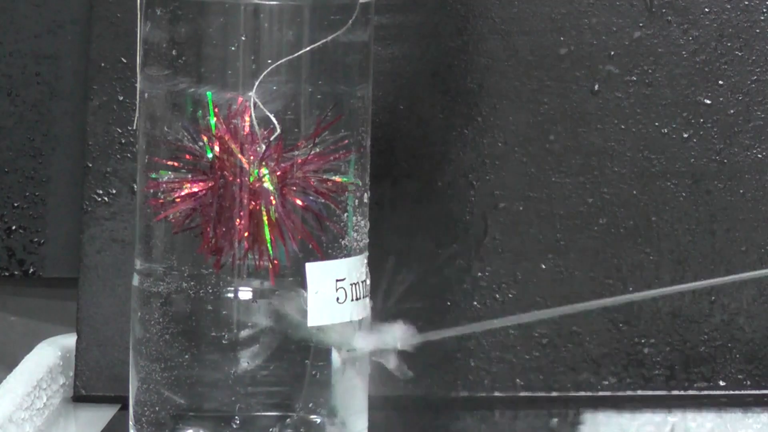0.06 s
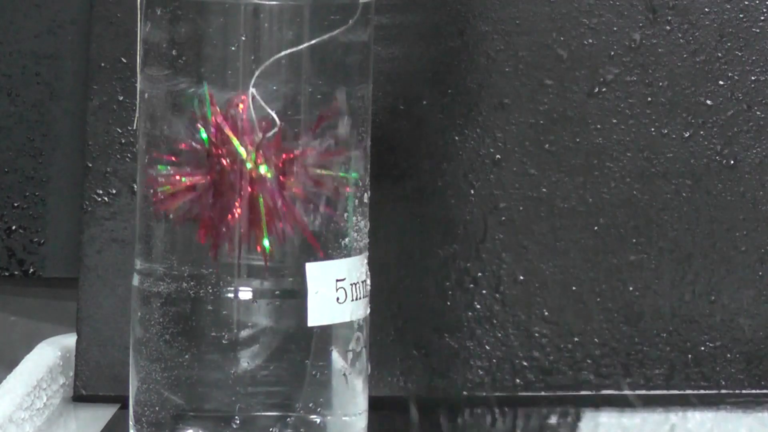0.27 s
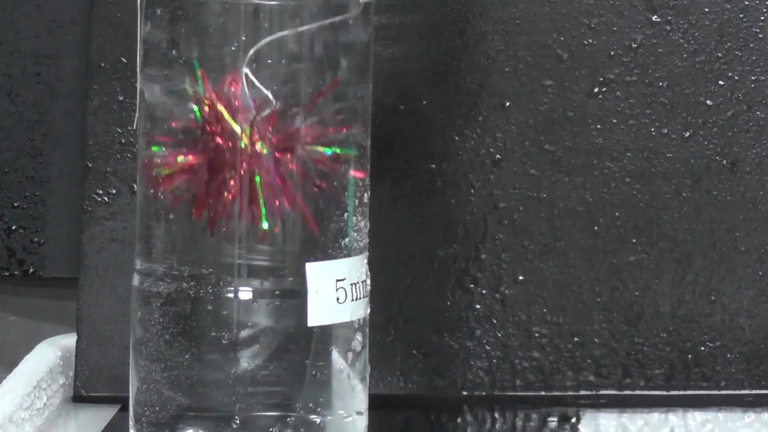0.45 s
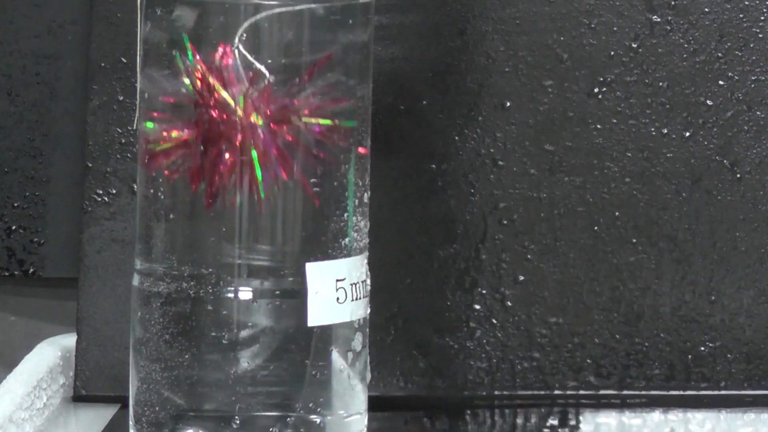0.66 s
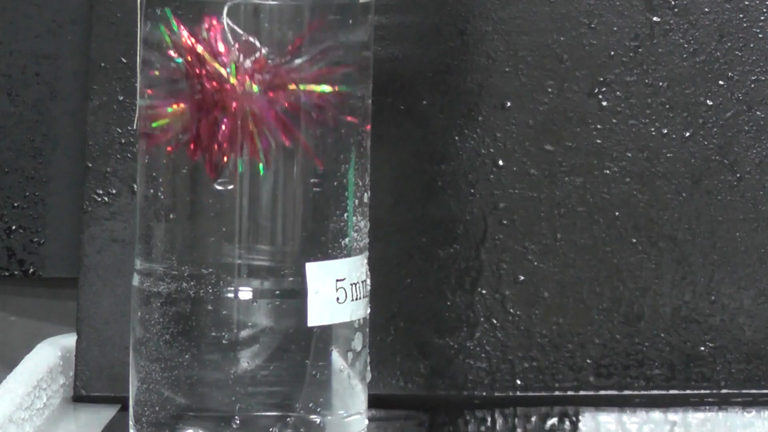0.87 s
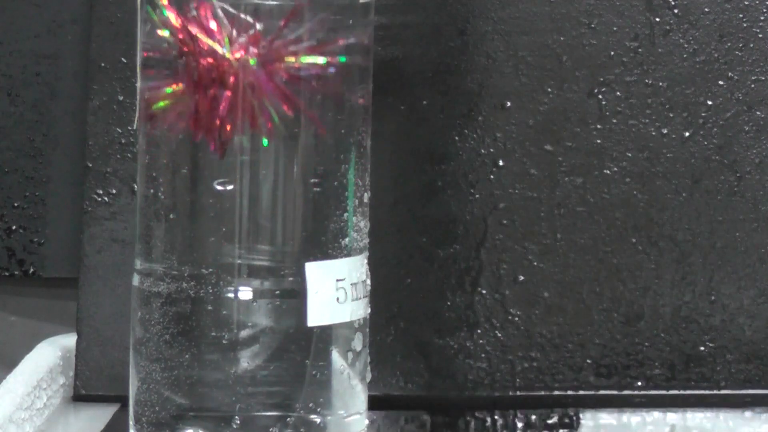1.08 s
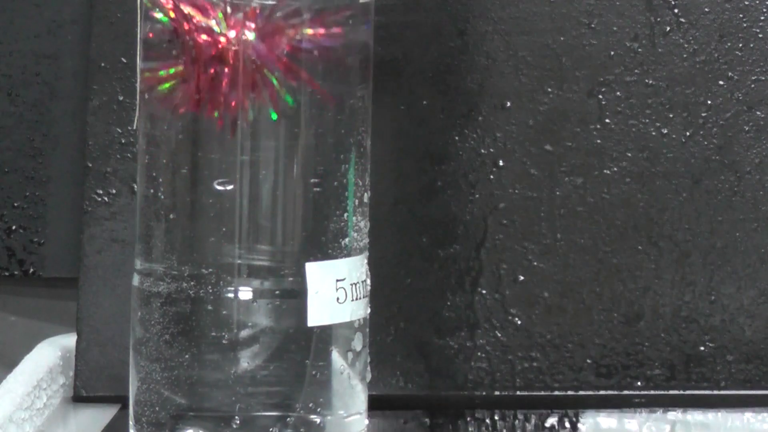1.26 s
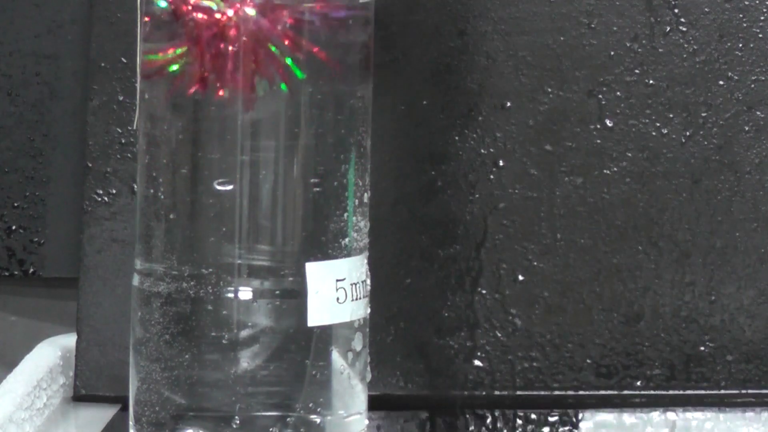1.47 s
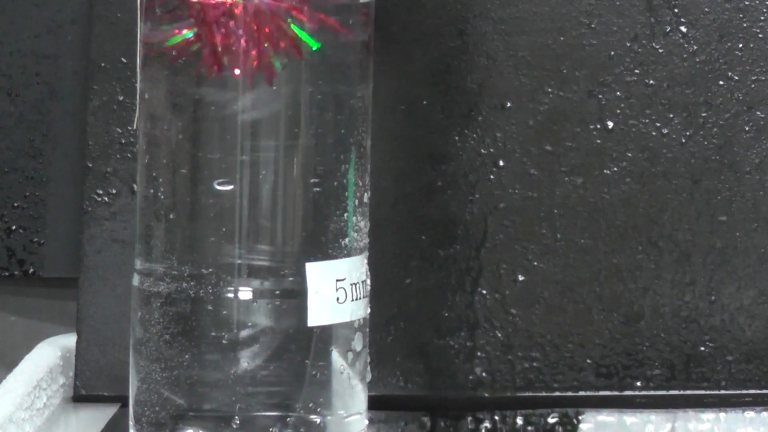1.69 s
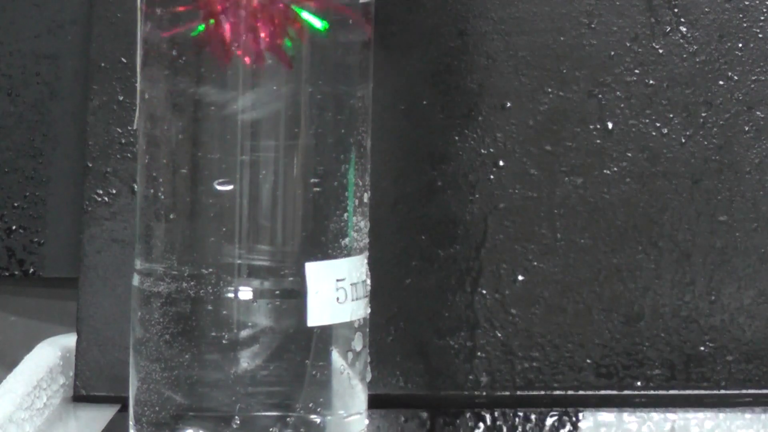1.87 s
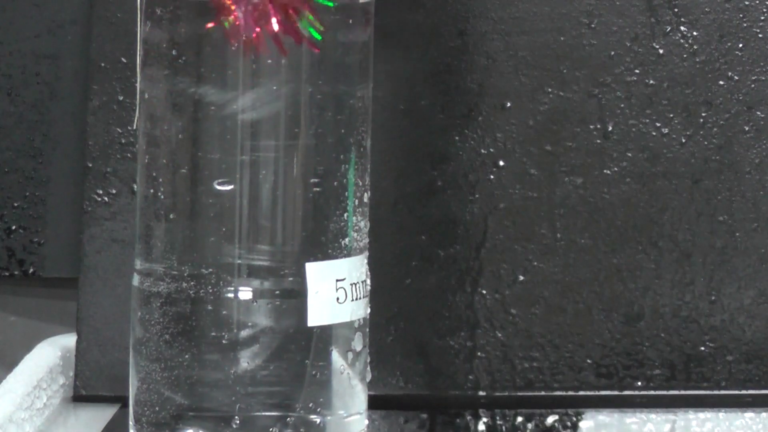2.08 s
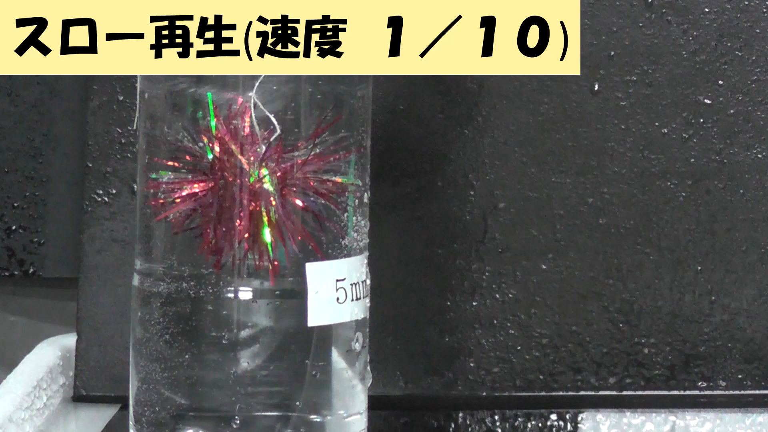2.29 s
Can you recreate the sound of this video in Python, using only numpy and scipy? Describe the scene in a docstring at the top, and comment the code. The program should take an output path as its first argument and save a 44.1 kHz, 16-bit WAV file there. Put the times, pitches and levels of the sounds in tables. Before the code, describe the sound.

Over a steady fan hum in a small room, a brief jet of water splashes against a full plastic bottle nearby, ending in tiny plinks. Afterwards a small motor ticks faintly, with two thin whirrs and two soft rustles.

```python
"""A fan hums from the start. Almost at once a water pistol squirts the side of a water-filled plastic
bottle: the jet breaks into drops that hiss on the plastic and drum its wall. The last slugs of water
plink, stray drops patter, and the spray dies away in a small room. Then a small motor, probably a lens
drive, ticks faintly; a soft rustle, two short motor whirrs and a second rustle follow.
Everything cuts off just before the end."""
import sys
import numpy as np
from scipy import signal
from scipy.fft import rfft, irfft
from scipy.io import wavfile
from scipy.ndimage import uniform_filter1d

SR = 44100
rng = np.random.default_rng(int(sys.argv[2]) if len(sys.argv) > 2 else 0)


def dump_mix(stems):
    """Bounce the given channels to the path in sys.argv[1] as a 16-bit WAV at rate SR."""
    frames = np.atleast_2d(stems).T  # one column per channel
    limited = np.clip(frames, -1, 1)  # hard clip at full scale
    pcm = np.round(limited * 32767).astype(np.int16)
    wavfile.write(sys.argv[1], SR, pcm)


N = 103061
TIME = np.arange(N) / SR
FREQS = np.maximum(np.arange(N + 1) * SR / (2 * N), 1)
SIDE = np.array([[1], [-1]])   # adds to the left, takes from the right
JET_START_S = .0205

# tone colour of the fan's air: f/Hz, relative level/dB
AIR_COLOUR = [(25, -18), (60, -15), (95, -13), (125, -14), (160, -7), (215, -2), (285, 1), (330, -7.5),
              (400, -7.5), (540, -8), (750, -14), (1150, -17), (1380, -26.5), (1700, -22.5), (2700, -32.5),
              (3600, -33.5), (4450, -40), (5100, -34), (6900, -33.5), (7750, -46.5), (8600, -37),
              (11000, -37), (15700, -42.5)]
# stereo focus of the air: f/Hz, left-right correlation
AIR_FOCUS = [(40, 0.87), (200, 0.99), (700, 0.89), (1400, 0.89), (2200, 0.98), (3800, 0.94), (5500, 0.85),
             (7500, 0.42), (10000, 0.45), (15000, 0.55)]
# pan of the air: f/Hz, left over right/dB
AIR_PAN = [(100, -1), (350, -0.53), (900, .3), (10000, 0)]
# the fan's hum and whines: f/Hz, rms level/dB, pitch wander width/Hz, flutter/dB
FAN_TONES = [(99, -54, 5, 0), (293.2, -49.5, 5.9, -1), (394.8, -48.5, 4.83, 1.5), (1231, -64.5, 2.4, -1),
             (2860, -65.5, 0.92, 1), (3824, -66, 2.2, 1), (4390, -75.5, 27, 2), (5459, -68, 18, 4)]
# envelope of the coarse spray: t/s, relative level/dB
COARSE_ENVELOPE = [(.021, -5.5), (.05, -0.5), (.15, -1), (.2, 0.5), (.235, -7), (.3, -19), (.45, -60)]
# envelope of the fine mist: t/s, relative level/dB
MIST_ENVELOPE = [(.021, -6.5), (.05, -3), (.13, 1), (.2, -6.5), (.235, -15), (.3, -34), (.45, -70)]
# tone colour of the splash: f/Hz, relative level/dB
SPLASH_COLOUR = [(150, -28), (400, -9.5), (1000, 0.5), (1700, -1), (2300, -3), (4500, -3), (5300, 2),
                 (7000, 1.5), (7700, -5), (8800, 3), (9500, 3), (11800, 4.5), (14000, -1.5), (15800, -11)]
# stereo focus of the splash: f/Hz, left-right correlation (held within +-0.99 in use)
SPLASH_FOCUS = [(200, 3.7), (1000, -0.2), (3000, 3), (6000, 1), (9000, 0), (13000, .45)]
# pan of the splash: f/Hz, left over right/dB
SPLASH_PAN = [(250, -10.5), (800, 0.5), (5000, 0), (9500, 1.5), (13000, -2.5)]
# narrow peaks and a dip that make the splash sizzle: f/Hz, gain/dB, width/Hz
SIZZLE_BANDS = [(4400, -2.5, 400), (5060, 5, 130), (5530, 1.5, 80), (6110, 3, 150), (6930, 1, 70),
                (8900, 4.5, 260), (11300, 1.5, 80), (11250, 5, 80), (11840, 7, 70)]
# how hard the jet drums the wall: t/s, relative level/dB
DRUM_ENVELOPE = [(.02, -12), (.05, 0), (.082, -4), (.108, -6), (.14, 2.5), (.172, 1), (.2, -8.5),
                 (.24, -9.5), (.3, -19.5), (.4, -50)]
# modes of the filled bottle: f/Hz, relative level/dB, t60/s
BOTTLE_MODES = [(154, -12, .1), (288.6, 3, .08), (524, -6, 0.11), (690.4, -5.5, .12), (759, -7.5, 0.11),
                (951, -1.5, .11), (1030, -8.5, 0.047), (1214, -7, 0.18), (1296, -9, 0.15),
                (1387, -18.5, .12), (1700, -12.5, 0.21)]
# dull rush of the wall between its modes: f/Hz, relative level/dB
THRUM_COLOUR = [(60, -28.5), (150, -1), (270, 0), (400, -4.5), (700, 1.5), (1000, 2), (1350, -3),
                (2200, -20.5), (5000, -37.5)]
# rings of the last slugs of water: t/s, f/Hz, level before the fade-in/dB, t60/s
SLUG_RINGS = [(.195, 950, -32, 0.12), (0.223, 1217, -26, 0.16)]
# modes of the motor housing: f/Hz, relative level/dB, t60/s
HOUSING_MODES = [(1653, -2.5, 0.026), (1780, -5.5, 0.023), (2055, -8, 0.02), (2440, -4, 0.021),
                 (3360, -18, .012), (5200, -19, .01), (6270, -12.5, .01)]
# soft rustles: crest t/s, level/dB, decay/s, upper edge f/Hz
RUSTLE_CUES = [(1.14, -52, .03, 11400), (2.155, -51.5, 0.044, 6260)]
# motor whirrs: t/s, length/s, level/dB
WHIRR_CUES = [(1.523, 0.13, -62), (1.903, .075, -61)]


def from_db(db):
    """Decibels to gain."""
    return 10 ** (np.asarray(db) / 20)


def unit_rms(x):
    """Scale to rms 1."""
    return x / np.sqrt(np.mean(x ** 2) + 1e-20)


def over_freq(points):
    """Draw a curve through (f/Hz, value) points on a log-frequency axis."""
    hz, value = np.transpose(points)
    return np.interp(np.log(FREQS), np.log(hz), value)


def fader(points):
    """Gain riding through (t/s, level/dB) points."""
    return from_db(np.interp(TIME, *np.transpose(points)))


def eq(x, gain):
    """Apply one gain per frequency."""
    return irfft(rfft(x, 2 * N) * gain)[..., :N]


def butter(x, hz, kind):
    """Gentle Butterworth filter."""
    return signal.sosfilt(signal.butter(2, hz, kind, fs=SR, output="sos"), x)


def resonate(x, hz, width_hz):
    """Two-pole resonance with gain 1 at its peak."""
    r = np.exp(-np.pi * width_hz / SR)
    feedback = [1, -2 * r * np.cos(2 * np.pi * hz / SR), r * r]
    return signal.lfilter(np.array([1, 0, -1]) * (1 - r * r) / 2, feedback, x + 1e-18)


def noise_band(low_hz, top_hz):
    """A band of hiss; rms 1."""
    return unit_rms(butter(rng.standard_normal(N), [low_hz, top_hz], "band"))


def drift(rate_hz):
    """Slow random wobble; rms 1."""
    return unit_rms(eq(rng.standard_normal(N), 1 / (1 + (FREQS / rate_hz) ** 2)))


def stereo(pair, colour, focus, pan):
    """Colour two unrelated signals and mix them as mid and side; rms 1."""
    alike = np.clip(over_freq(focus), -.99, .99)
    gain = from_db(over_freq(colour) + SIDE * over_freq(pan) / 2)
    mid = eq(pair[0], gain * np.sqrt(1 + alike))
    side = eq(pair[1], gain * np.sqrt(1 - alike))
    return unit_rms(mid + SIDE * side)


def fan():
    """A bed of turbulent air, its low end fluttering, with wavering hum and thin whines."""
    air = stereo(rng.standard_normal((2, N)), AIR_COLOUR, AIR_FOCUS, AIR_PAN)
    low_end = eq(air, 1 / (1 + (FREQS / 700) ** 4))
    flutter = from_db(.83 * drift(rate_hz=5.4))
    out = from_db(-37) * (air + low_end * (flutter - 1))
    for hz, db, width_hz, flutter_db in FAN_TONES:
        phase = 2 * np.pi * np.cumsum(hz + width_hz / 2 * drift(width_hz)) / SR
        out += from_db(db + flutter_db * drift(rate_hz=9.2)) * np.sqrt(2) * np.sin(phase)
    return out


def drops(per_s, spread_db):
    """Two unrelated streams of drop impacts of uneven size; rms 1."""
    sizes = from_db(spread_db * np.minimum(rng.exponential(1, (2, N)), 4))
    polarity = rng.choice([-1, 1], (2, N))
    lands = rng.random((2, N)) < per_s / SR
    return unit_rms(sizes * polarity * lands)


def jet_flow(envelope, attack_s=.0007, slap_decay_s=.0017):
    """The head of the jet slaps the wall, then the spray swells and collapses."""
    age = np.maximum(TIME - JET_START_S, 0)
    slap = 1 + from_db(2) * np.exp(-age / slap_decay_s)
    return np.clip(age / attack_s, 0, 1) * slap * fader(envelope)


def splash(mist_above_hz=8060):
    """Thousands of tiny impacts hiss on the plastic; the bright, fine mist ends first."""
    hiss = stereo(drops(per_s=12000, spread_db=2), SPLASH_COLOUR, SPLASH_FOCUS, SPLASH_PAN)
    sizzle_db = sum(db / (1 + (2 * (FREQS - hz) / width) ** 2) for hz, db, width in SIZZLE_BANDS)
    hiss = unit_rms(eq(hiss, from_db(sizzle_db)))
    coarse = eq(hiss, 1 / (1 + (FREQS / mist_above_hz) ** 6))
    mist = hiss - coarse
    return from_db(-23) * (coarse * jet_flow(COARSE_ENVELOPE) + mist * jet_flow(MIST_ENVELOPE))


def bottle(hits_per_s=2500):
    """The body of the squirt: drops drum the bottle wall, ringing its modes over a dull thrum."""
    push = fader(DRUM_ENVELOPE) * (TIME > JET_START_S)
    modes = 0
    for hz, db, t60 in BOTTLE_MODES:
        hits = drops(hits_per_s, spread_db=.5) * push
        mid, side = resonate(hits, hz, width_hz=np.log(1000) / (np.pi * t60))
        width = from_db(-18.5) * min(hz / 700, 1)   # low modes sit nearer the centre
        modes += from_db(db) * (unit_rms(mid) + width * SIDE * unit_rms(side))
    thrum = stereo(drops(hits_per_s, spread_db=3.5), THRUM_COLOUR, SPLASH_FOCUS, SPLASH_PAN)
    push_rms = np.sqrt(np.mean(push ** 2))
    return from_db(-33) * push_rms * modes + from_db(-33.5) * push * thrum


def patter(crest_s=.2, slope_db_per_s=106.5, hz=6100, width_hz=2200):
    """Stray drops fall back on the wet wall and the sink, building under the jet and trailing after it."""
    hits = drops(per_s=3200, spread_db=3)
    ticks = unit_rms(resonate(resonate(hits, hz, width_hz), hz, width_hz))
    ticks = ticks + .4 * ticks[::-1]   # each channel bleeds into the other
    swell = from_db(-44 - slope_db_per_s * np.abs(TIME - crest_s))
    return ticks * swell * (TIME > JET_START_S)


def room(x, t60_s=.37, low_cut_hz=450, high_cut_hz=7100, predelay_s=.004):
    """A small room answers with a short diffuse tail, different at each ear."""
    t = TIME[:SR // 2]
    tail = butter(rng.standard_normal((2, len(t))), high_cut_hz, "low")
    tail *= from_db(-60 * t / t60_s) * (t > predelay_s)
    tail /= np.sqrt(np.sum(tail ** 2) / 2)
    send = from_db(-14) * butter(x, low_cut_hz, "high")
    return signal.fftconvolve(send, tail, axes=1)[:, :N]


def plinks(rise_s=.005):
    """The last slugs of water land with short pitched rings, like trapped bubbles."""
    out = 0
    for start_s, hz, db, t60 in SLUG_RINGS:
        age = np.maximum(TIME - start_s, 0)
        fade_in = 1 - np.exp(-age / rise_s)
        out += fade_in * from_db(db - 60 * age / t60) * np.sin(2 * np.pi * hz * age)
    return out


def motor_ticks(start_s=.9465, step_s=.033367, count=35, grit_decay_s=.003):
    """Evenly spaced knocks, strong and weak in turn, ring the motor's housing with a gritty edge."""
    step = np.arange(count)
    knock_db = -40 - 5 * (step % 2) + rng.normal(0, 1, count)
    knocks = np.zeros(N)
    knocks[((start_s + step * step_s) * SR).astype(int)] = from_db(knock_db)
    age = TIME[:SR // 20]
    housing = sum((-1) ** n * from_db(db - 60 * age / t60) * np.sin(2 * np.pi * hz * age)
                  for n, (hz, db, t60) in enumerate(HOUSING_MODES))
    bursts = signal.fftconvolve(knocks, np.exp(-age / grit_decay_s))[:N]
    grit = from_db(-13) * bursts * noise_band(1400, 6750)
    return signal.fftconvolve(knocks, housing)[:N] + grit


def rustles(rise_s=.014, low_hz=2290):
    """Two faint brushes of hiss that swell and die away."""
    out = 0
    for crest_s, db, decay_s, top_hz in RUSTLE_CUES:
        swell = np.exp(-np.maximum((crest_s - TIME) / rise_s, (TIME - crest_s) / decay_s))
        out += from_db(db) * swell * noise_band(low_hz, top_hz)
    return out


def motor_whirrs(hz=8750, width_hz=450):
    """The motor gives two short, thin, high whirrs."""
    gate = sum(from_db(db) * ((TIME > start_s) & (TIME < start_s + length_s))
               for start_s, length_s, db in WHIRR_CUES)
    soft_gate = uniform_filter1d(gate, size=300)
    return soft_gate * noise_band(hz - width_hz / 2, hz + width_hz / 2)


def scene():
    """The squirt up front in its room; fan, motor and rustles behind."""
    squirt = splash() + bottle() + patter() + plinks()
    return squirt + room(squirt) + fan() + motor_ticks() + rustles() + motor_whirrs()


def record(dry, stop_s=2.243, fade_s=.0077, high_cut_hz=15800):
    """The mix stops abruptly, and a steep high cut takes off the very top."""
    gate = np.clip((stop_s - TIME) / fade_s, 0, 1)
    return eq(dry * gate, 1 / np.sqrt(1 + (FREQS / high_cut_hz) ** 400))


dry = scene()
out = record(dry)
dump_mix(out)
```